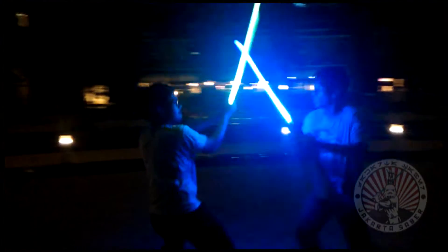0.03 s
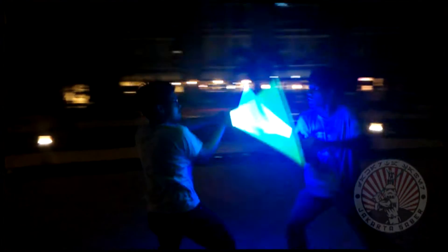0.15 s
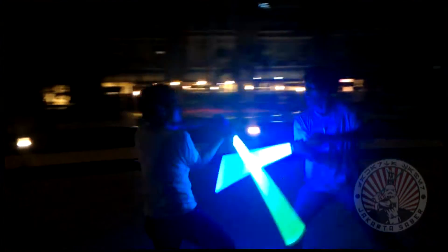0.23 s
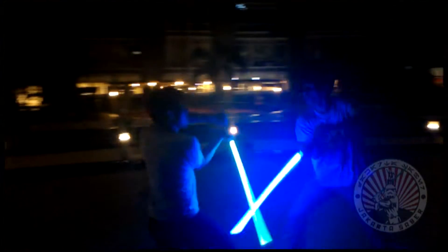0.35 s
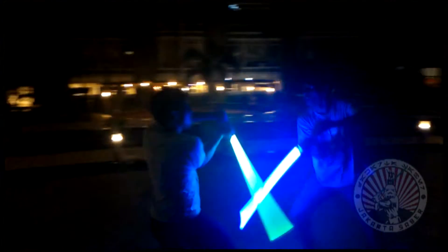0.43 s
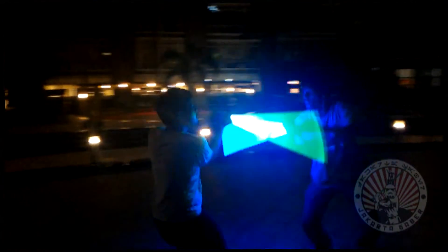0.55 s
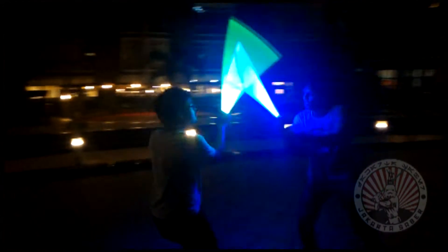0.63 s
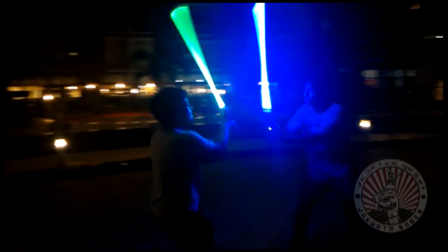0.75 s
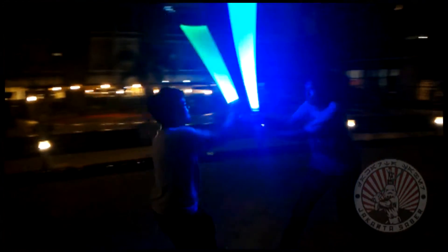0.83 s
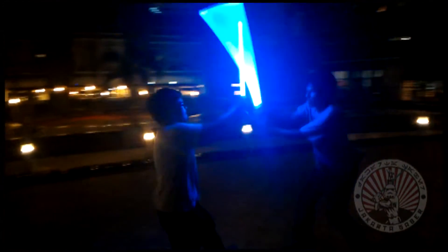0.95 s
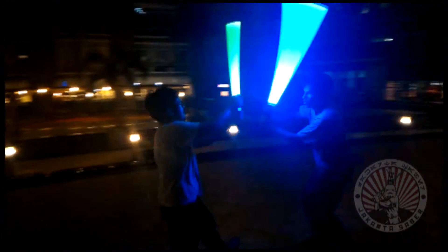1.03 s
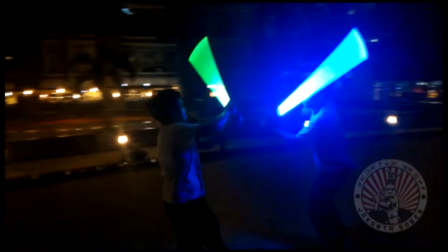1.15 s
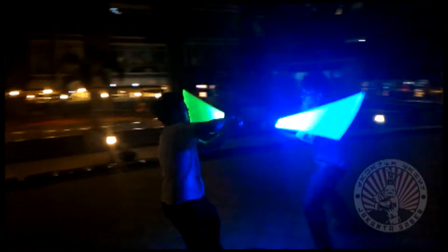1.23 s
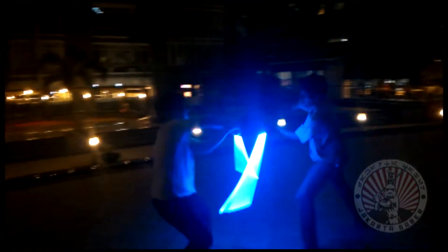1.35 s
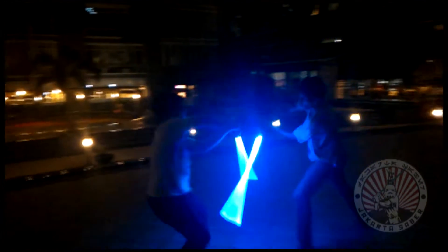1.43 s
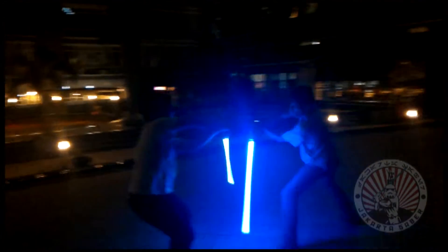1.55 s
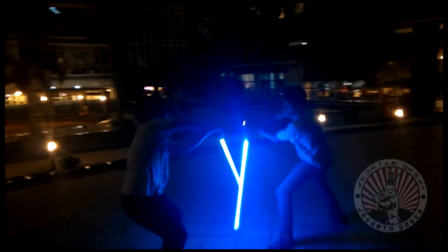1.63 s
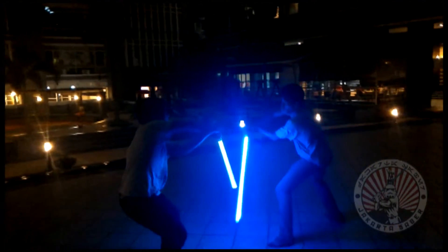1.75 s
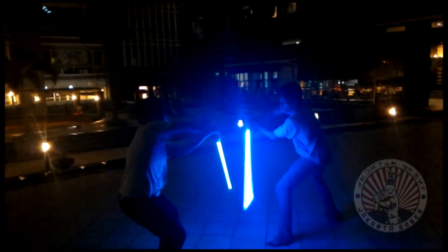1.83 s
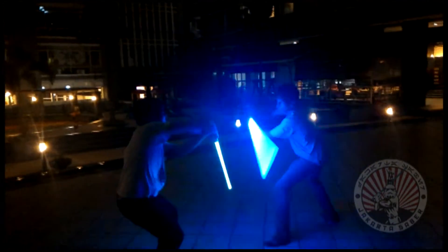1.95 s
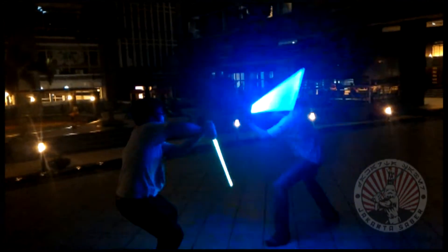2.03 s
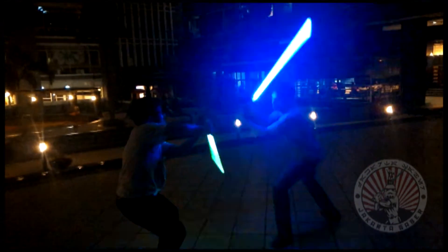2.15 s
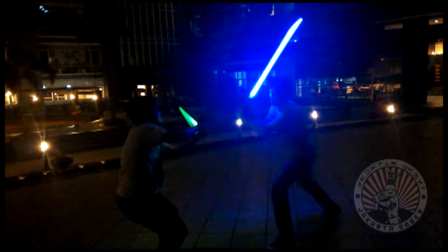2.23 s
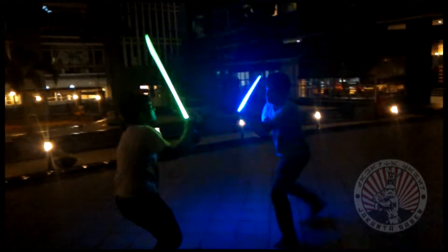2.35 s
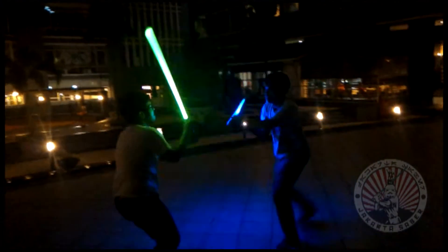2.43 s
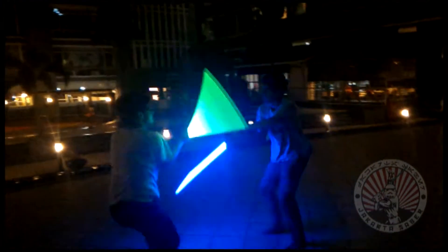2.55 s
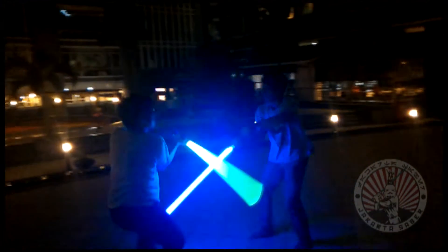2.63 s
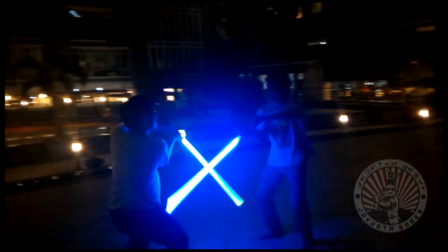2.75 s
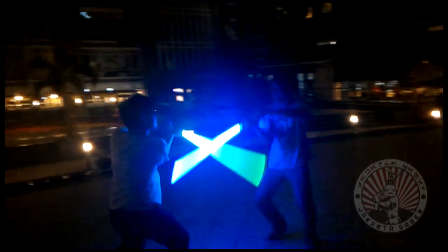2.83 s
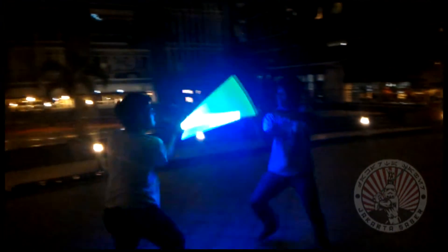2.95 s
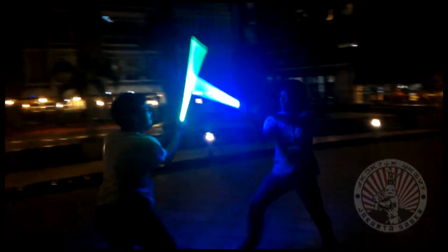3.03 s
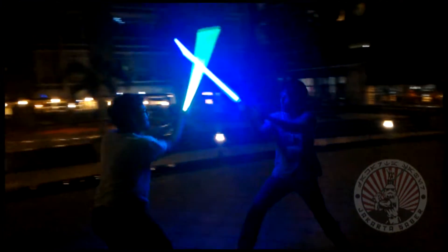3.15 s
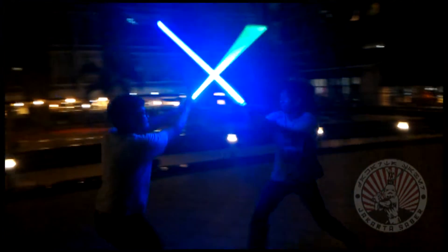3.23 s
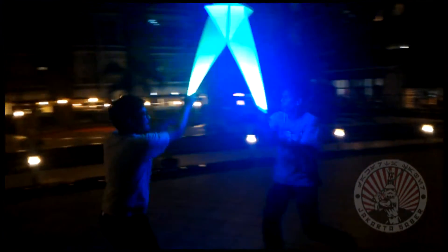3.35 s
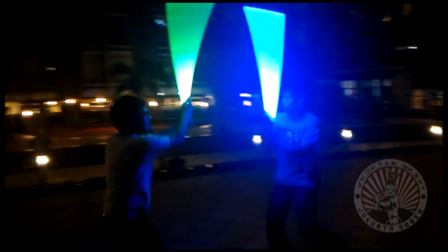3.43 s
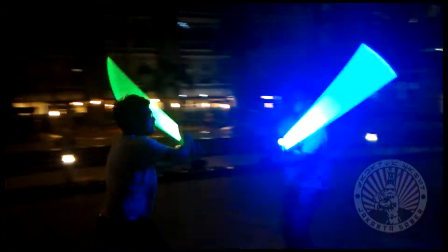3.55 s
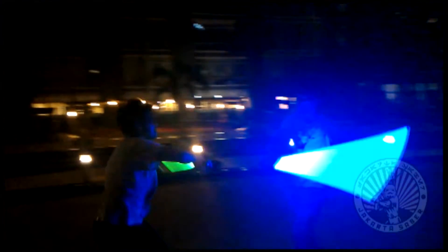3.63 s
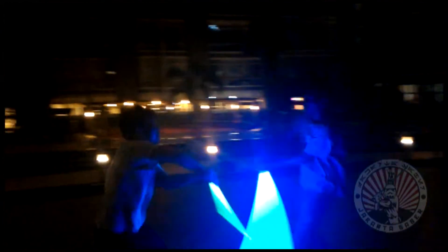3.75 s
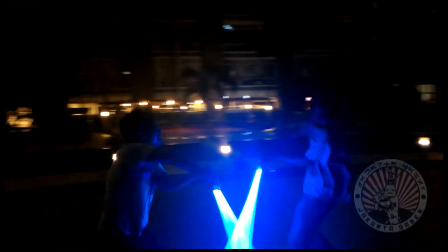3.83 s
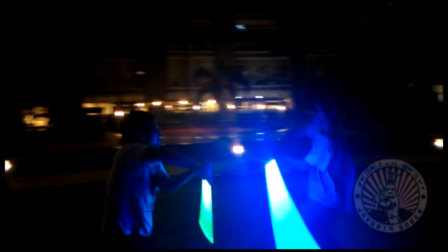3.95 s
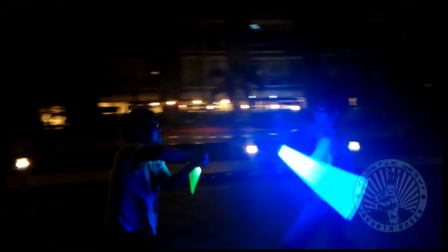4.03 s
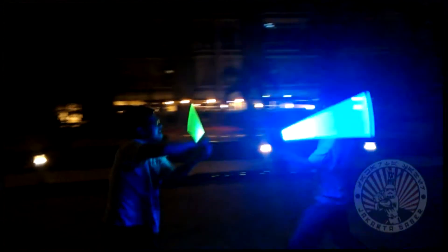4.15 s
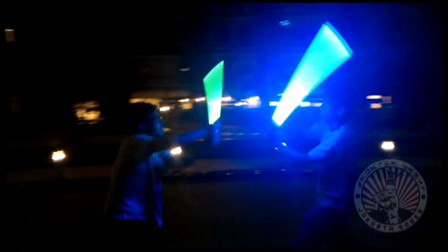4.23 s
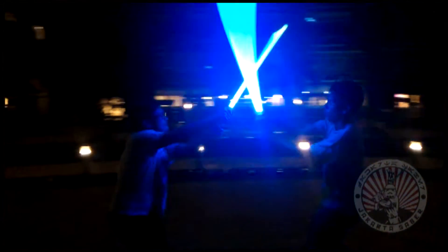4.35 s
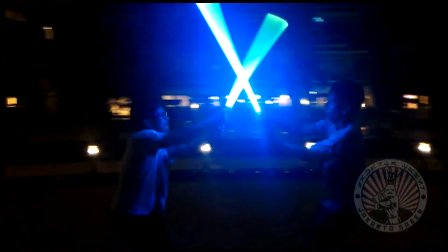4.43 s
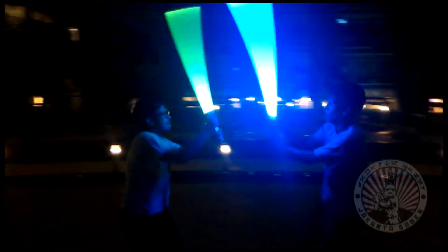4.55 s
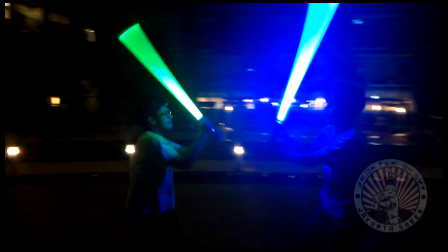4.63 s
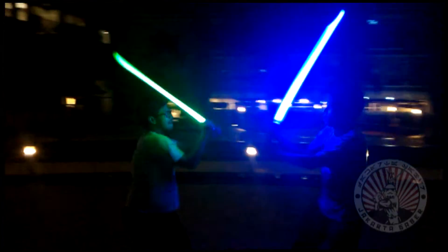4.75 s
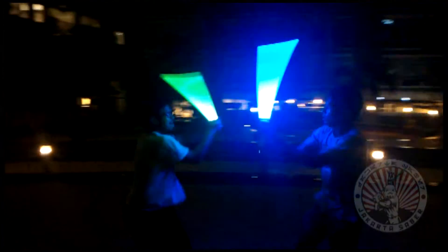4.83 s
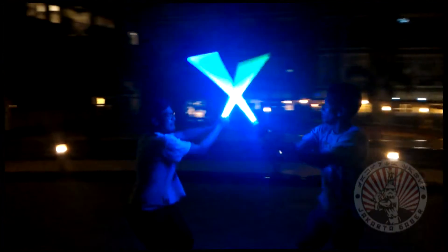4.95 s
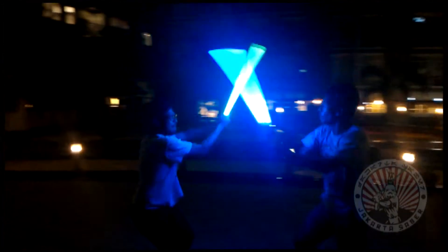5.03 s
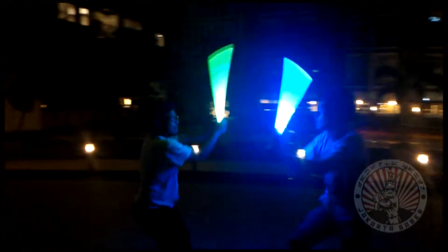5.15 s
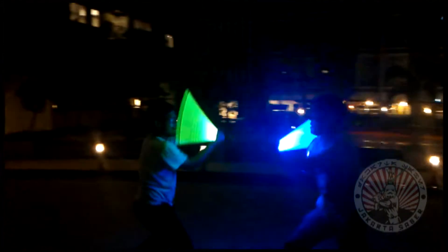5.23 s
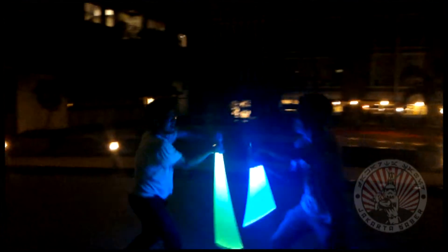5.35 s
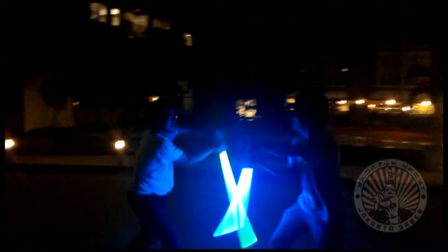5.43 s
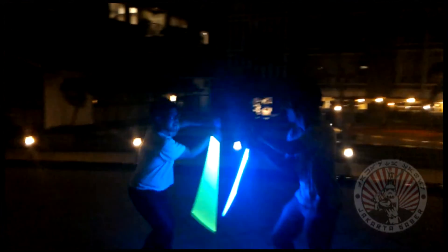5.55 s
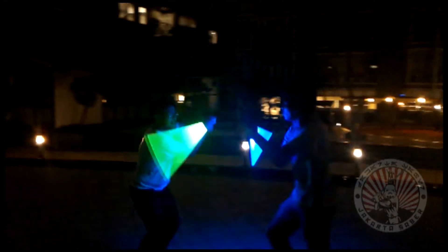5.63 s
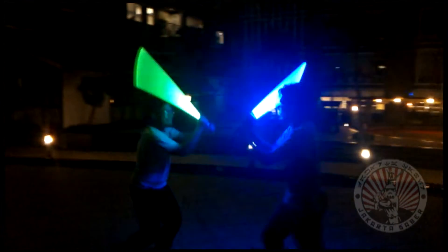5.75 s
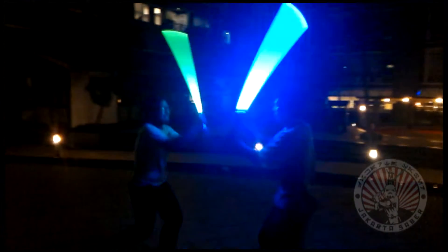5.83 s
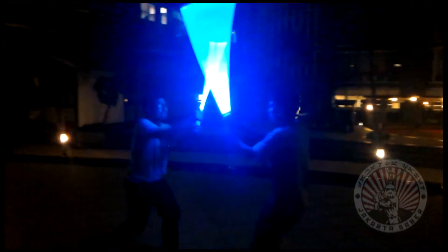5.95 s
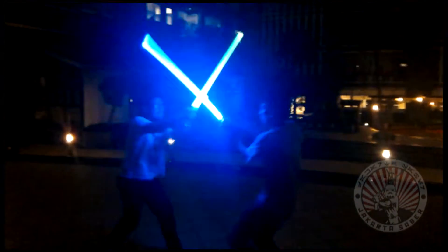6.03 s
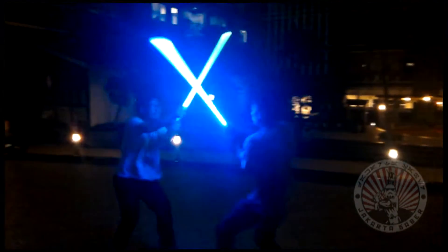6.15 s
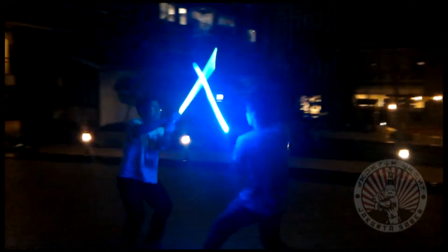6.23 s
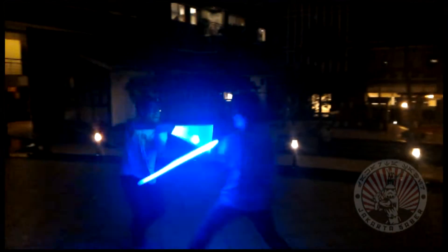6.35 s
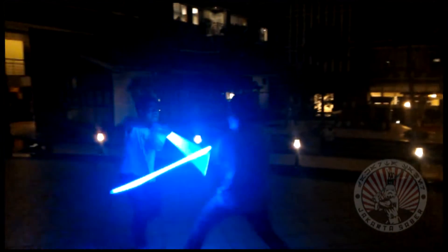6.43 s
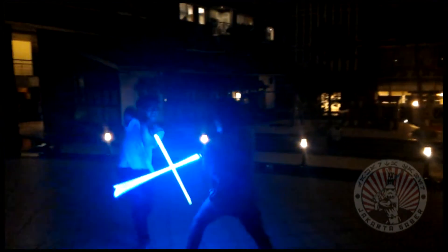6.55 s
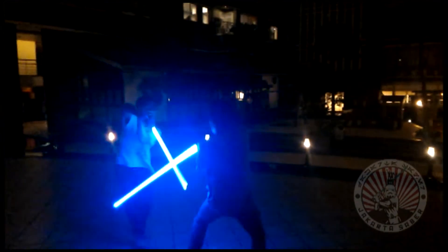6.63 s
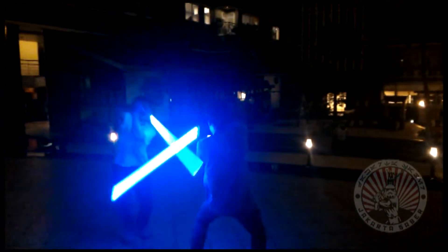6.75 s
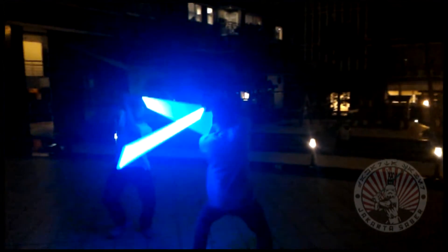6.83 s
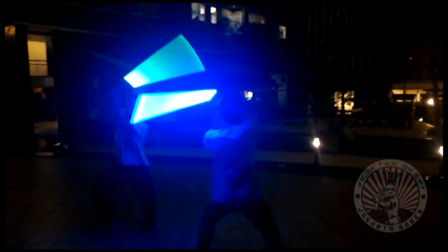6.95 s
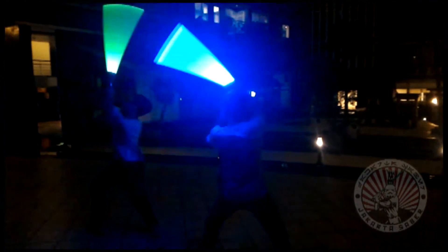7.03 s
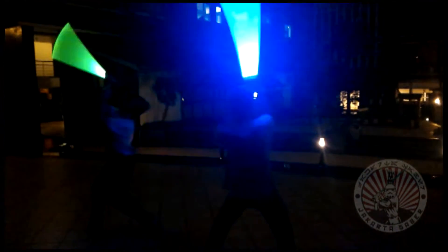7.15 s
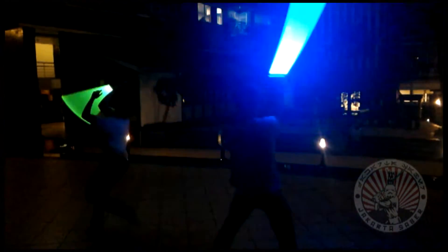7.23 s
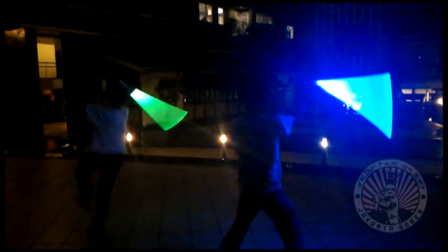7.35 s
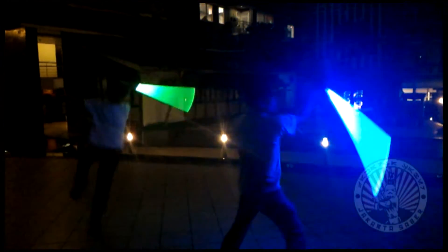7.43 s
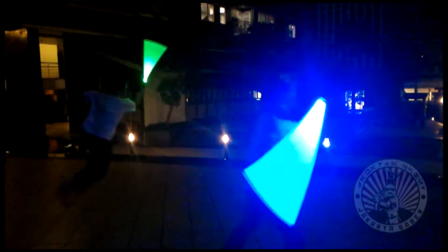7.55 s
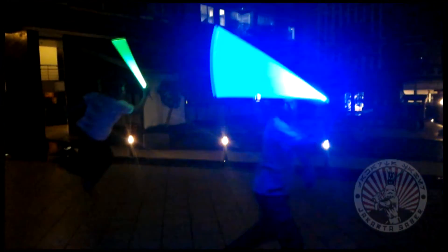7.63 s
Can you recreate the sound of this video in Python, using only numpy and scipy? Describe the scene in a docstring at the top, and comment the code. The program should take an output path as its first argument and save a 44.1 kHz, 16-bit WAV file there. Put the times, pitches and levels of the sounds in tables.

```python
"""Two people spar with hollow plastic light-sword blades on a paved square, a few metres from a small camera.
Each clack is a blow, a rebound and a short chatter of the tubes, built from decaying modes and noise.
Paving and house fronts throw it back as filtered noise echoes. Shoes tap and scuff as resonant and hissing noise.
Wind nudges the microphone as deep noise, and traffic rumbles beyond the square with a weak drone and faint squeal."""
import sys
import numpy as np
from scipy import signal
from scipy.fft import rfft, irfft
from scipy.io import wavfile
from scipy.ndimage import uniform_filter1d

SR = 44100
rng = np.random.default_rng(int(sys.argv[2]) if len(sys.argv) > 2 else 0)


def wav_out(sig):
    """Save sig, one row per channel (or a flat mono array), as 16-bit PCM at SR to the path in sys.argv[1]."""
    wavfile.write(sys.argv[1], SR, np.round(np.clip(np.atleast_2d(sig).T, -1, 1) * 32767).astype(np.int16))


N = 339129
T = np.arange(N) / SR

# ringing modes of the hollow tubes: f/Hz, level/dB (relative), t60/s
TUBE_MODES = [(236, -5.5, 0.082), (322, -26, 0.079), (448, -9.5, 0.12), (530, -11.5, 0.11),
              (643, -0.5, 0.054), (893, -6, 0.019), (1070, 0.5, 0.03), (1165, -3, 0.048),
              (1302, -4.5, 0.061), (1523, 1, 0.016), (1630, -10, 0.078), (1957, 0.5, 0.082),
              (2470, 0.5, 0.017), (2660, -12, 0.024), (2854, 1, 0.043), (3010, 2, 0.043),
              (3255, -2.5, 0.017)]


def undb(db):
    """Decibels to gain."""
    return 10 ** (np.asarray(db) / 20)


def unit(x):
    """Scale to an energy of one."""
    return x / np.sqrt(np.sum(x ** 2))


def level(x, db):
    """Scale to an rms level in dB."""
    return x * undb(db) / np.std(x)


def curve(rows):
    """Join (t/s, value) rows by straight lines."""
    return np.interp(T, *np.transpose(rows))


def swells(rows):
    """Gain of sounds that rise and fall smoothly: (middle t/s, length/s, level/dB) rows."""
    return sum(undb(db) * np.exp(-2 * ((T - s) / length) ** 2) for s, length, db in rows)


def fade(t, t60):
    """Exponential decay by 60 dB in t60 seconds."""
    return np.exp(-np.log(1000) * t / t60)


def add(track, s, x):
    """Mix x into track at time s."""
    i = max(int(s * SR), 0)
    part = x[:max(len(track) - i, 0)]
    track[i:i + len(part)] += part


def colour(x, points, size=8192):
    """Causal filter through (f/Hz, level/dB) points, built from the cepstrum."""
    hz, db = np.transpose(points)
    f = np.maximum(np.fft.rfftfreq(size, 1 / SR), 1)
    cepstrum = irfft(np.log(undb(np.interp(np.log(f), np.log(hz), db))))
    # folding the cepstrum onto positive times gives minimum phase
    cepstrum[1:size // 2] *= 2
    cepstrum[size // 2 + 1:] = 0
    impulse = irfft(np.exp(rfft(cepstrum)))
    return signal.fftconvolve(x, impulse)[:len(x)]


def band(x, hz, width_hz):
    """One resonance, gain 1 at its centre."""
    return signal.lfilter(*signal.iirpeak(hz, hz / width_hz, fs=SR), x)


def walk(rate):
    """Slow random wander with a spread of one, from rate random steps a second, smoothed twice."""
    k = int(SR / rate)
    steps = np.repeat(rng.standard_normal(N // k + 1), k)
    smooth = uniform_filter1d(uniform_filter1d(steps, k), k)
    return level(smooth[:N], 0)


def traffic(db=-47, engine_sway_db=0.43, tyre_sway_db=0.42, squeal_hz=1725, squeal_width_hz=30,
            drone_hz=500, drone_db=-63):
    """Distant engines and tyres are low and high noise, wavering a little, with a weak drone and a thin squeal."""
    # how busy the road is: t/s, level/dB
    busy = [(0, 1), (1, -1.5), (4.8, -.5), (7.1, 2.5), (7.69, 0)]
    # spectrum of the road heard across the square: f/Hz, level/dB
    road_colour = [(20, -8.5), (60, 3.5), (115, 6.5), (170, 2), (250, -3), (350, -8), (500, -9), (800, -10),
                   (1200, -10.5), (1700, -15.5), (2300, -17), (4000, -23), (8000, -23), (14000, -26.5)]
    # far squeals: middle t/s, length/s, level/dB
    squeals = [(0.66, 0.23, -59.5), (1.5, 0.71, -61.5), (3.22, 0.29, -66)]
    engines, tyres, drone, squeal = rng.standard_normal((4, N))
    busy_db = curve(busy)
    lowpass = signal.butter(2, 300, fs=SR, output="sos")
    highpass = signal.butter(2, 300, "high", fs=SR, output="sos")
    low = signal.sosfilt(lowpass, engines) * undb(busy_db + engine_sway_db * walk(6.7))
    # the tyres follow the swell only slightly
    high = signal.sosfilt(highpass, tyres) * undb(0.079 * busy_db + tyre_sway_db * walk(6.5))
    roar = level(colour(low + high, road_colour), db)
    drone = level(band(drone, drone_hz, 32), drone_db)
    squeal = band(band(squeal, squeal_hz, squeal_width_hz), squeal_hz, squeal_width_hz)
    return roar + drone + level(squeal, 0) * swells(squeals)


def wind(sway_db=3.5, sways_per_s=12):
    """Gusts buffet the microphone over a light breeze; the eddies are slow, so it is all deep rumble."""
    # spectrum of the rumble: f/Hz, level/dB
    wind_colour = [(10, -11), (22, 1), (33, 2), (50, -5), (75, -8), (120, -17), (200, -33.5), (400, -43),
                   (1500, -76)]
    # the light breeze between the gusts: t/s, level/dB
    breeze_rows = [(0, -50), (1.5, -50.5), (4.6, -50), (6.3, -48.5), (7.69, -49)]
    # gusts on the microphone: middle t/s, length/s, level/dB
    gusts = [(1.975, 0.052, -30.5), (2.09, 0.038, -29.5), (2.25, 0.38, -38), (2.365, 0.058, -24),
             (2.81, 0.24, -34), (3.06, 0.11, -31.5), (3.6, 0.055, -41), (3.9, 0.26, -44),
             (4.22, 0.062, -41.5), (5.215, 0.06, -33), (5.42, 0.14, -38), (5.8, 0.087, -41.5),
             (7.03, .05, -38), (7.46, 0.12, -46)]
    eddies = colour(rng.standard_normal(N), wind_colour)
    # even out the noise, so that the tables alone set its level
    eddies /= np.sqrt(uniform_filter1d(eddies ** 2, SR // 6))
    breeze = undb(curve(breeze_rows) + sway_db * walk(sways_per_s))
    return eddies * np.hypot(breeze, swells(gusts))


def shoes(step_t60=0.066, grit_db=2):
    """Soles landing give dull taps of resonant noise; sliding soles give a hiss with a gritty flutter."""
    # shoes landing on the paving: t/s, level/dB (of energy), f/Hz
    landings = [(0.066, -19, 835), (0.1562, -22.5, 1160), (2.6793, -27, 1100), (2.7927, -25, 890),
                (3.215, -26, 1000), (5.337, -16.5, 990), (5.77, -19, 1200)]
    # soles sliding: middle t/s, length/s, level/dB (relative)
    scuffs = [(0.028, 0.2, -54), (1.07, 0.13, -48.5), (1.294, 0.16, -57), (1.547, 0.25, -53),
              (2.432, .25, -58), (2.625, .16, -62), (3.206, 0.15, -59), (5.71, 0.28, -56.5),
              (6.34, 0.31, -57), (7.615, 0.45, -58)]
    # spectrum of the slide: f/Hz, level/dB
    scuff_colour = [(300, -37), (2000, 1), (4000, 3.5), (6500, 7), (11000, 8.5), (14000, 7)]
    out, t = np.zeros(N), T[:SR // 4]
    for s, db, hz in landings:
        thud = rng.standard_normal(len(t)) * fade(t, step_t60)
        tap = band(band(thud, hz, 660), hz, 1500)
        add(out, s, undb(db) * unit(tap))
    grit = undb(grit_db * walk(74))
    hiss = level(colour(rng.standard_normal(N), scuff_colour), 1.1)
    return out + swells(scuffs) * grit * hiss


def square(near, outward, scatter_db=-18, scatter_t60=0.35, slap_s=0.053, slap_db=-24,
           far_s=0.11, far_db=-18.5, far_t60=1.8):
    """Open-air echo: quick scatter off paving and kerbs, one slap, then a thin late wash from the house fronts."""
    # spectrum of what the square returns: f/Hz, level/dB
    echo_colour = [(100, -12), (300, 6), (1000, 1), (2600, -5), (5000, 1.5), (9000, -3.5), (14000, -8)]
    t = T[:SR]
    quick, slap, late = rng.standard_normal((3, SR))
    ground, fronts = np.zeros((2, SR))
    add(ground, 0.012, undb(scatter_db) * unit(quick * fade(t, scatter_t60)))
    add(ground, slap_s, undb(slap_db) * unit(slap * fade(t, 0.011)))
    onset = 1 - np.exp(-t / 0.0044)
    add(fronts, far_s, undb(far_db) * unit(late * fade(t, far_t60) * onset))
    echo = signal.fftconvolve(near, ground) + signal.fftconvolve(outward, fronts)
    return colour(echo[:N], echo_colour)


def contact(t, wall_hz, wall_db=-7, wall_t60=0.0033, ring_db=-6, crack_db=-4, crack_t60=0.008, detune=0.017):
    """One contact: a click, a noisy crack, a brief ping of the tube wall and modes of varying tuning and sign."""
    hz, db, t60 = np.transpose(TUBE_MODES)[:, :, None]
    tuning, side = rng.standard_normal((2, len(hz), 1))
    tones = np.sin(2 * np.pi * hz * (1 + detune * tuning) * t)
    ring = np.sum(np.sign(side) * undb(db) * fade(t, t60) * tones, axis=0)
    wall = np.cos(2 * np.pi * wall_hz * t) * fade(t, wall_t60)
    crack = rng.standard_normal(len(t)) * fade(t, crack_t60)
    # the crackle of hard plastic is nearly all treble
    crack = colour(crack, [(1000, -21), (3500, -13), (6000, -4), (13000, -0.5)])
    click = t == 0
    return click + undb(wall_db) * unit(wall) + undb(crack_db) * unit(crack) + undb(ring_db) * unit(ring)


def chatter(t, t60, rate=1000, buzz_db=-5, buzz_stretch=2.64, onset_s=0.0016, hollow_db=2):
    """The shaken tubes rattle against each other: dying ticks over a fine buzz, which ring the same modes."""
    size, buzz = rng.standard_normal((2, len(t)))
    # rate is the mean number of ticks per second
    ticks = size * (rng.random(len(t)) < rate / SR)
    build = 1 - np.exp(-t / onset_s)
    ticks = unit(ticks * build * fade(t, t60))
    buzz = unit(buzz * build * fade(t, buzz_stretch * t60))
    rattle = ticks + undb(buzz_db) * buzz
    # a resonance decays faster the wider it is
    ring = sum(undb(db) * band(rattle, hz, np.log(1000) / (np.pi * ring_t60))
               for hz, db, ring_t60 in TUBE_MODES)
    tone = [(300, 1.5), (1200, 2), (2800, 0.5), (6000, 4.5), (13000, 3)]
    return unit(colour(rattle + undb(hollow_db) * ring, tone))


def disperse(x, lag_ms=((300, 1.5), (700, 4), (1100, 5), (1600, 3.5), (2300, 0.6), (3000, 0))):
    """Bending waves of middle pitch travel slowly along the tube and arrive after the snap: (f/Hz, lag/ms)."""
    hz, ms = np.transpose(lag_ms)
    f = np.fft.rfftfreq(len(x), 1 / SR)
    lag = np.interp(f, hz, ms) / 1000
    # phase is the running sum of the delay over frequency
    phase = 2 * np.pi * np.cumsum(lag) * f[1]
    return irfft(rfft(x) * np.exp(-1j * phase), len(x))


def clack(wall_hz, rebound_ms, rebound_db, chatter_db, chatter_t60, loose_db=7.0, wall_gain=0.47,
          wall_width_hz=220, ping_hz=13400, ping_db=-4, ping_t60=0.0026):
    """Blow, rebound and chatter, with a brief, very high ping and one favoured resonance of the wall."""
    t = T[:SR // 4]
    ping = unit(np.sin(2 * np.pi * ping_hz * t) * fade(t, ping_t60))
    blow = contact(t, wall_hz) + undb(ping_db) * ping
    x = blow + undb(chatter_db + loose_db) * chatter(t, chatter_t60)
    add(x, rebound_ms / 1000, undb(rebound_db) * contact(t, wall_hz))
    return disperse(x + wall_gain * band(x, wall_hz, wall_width_hz))


def balance(x, db, body_db, body_tilt_db, snap_db, snap_tilt_db):
    """Share a blow's energy: the spot that is hit colours the body, the hardness of the contact the snap."""
    # edges of the bands that are balanced: f/Hz
    band_edges = [200, 700, 1350, 2100, 4000, 11800, 14000]
    # the tube's bending modes fill the body; the wall rings above it, and the snap lies above that
    body_pivot_hz, body_top_hz, snap_from_hz = 1000, 2100, 4000
    bass_loss_db = 24  # thin tubes radiate little bass
    edges = np.array(band_edges)
    hz = np.sqrt(edges[:-1] * edges[1:])
    body = (hz < body_top_hz) * (body_db + body_tilt_db * np.log2(hz / body_pivot_hz))
    snap = (hz > snap_from_hz) * (snap_db + snap_tilt_db * np.log2(hz / (2 * snap_from_hz)))
    bands = np.split(np.abs(rfft(x)) ** 2, edges * len(x) // SR)[1:-1]
    present_db = [10 * np.log10(b.mean()) for b in bands]
    gains_db = db + body + snap - present_db
    bass = [(60, gains_db[0] - bass_loss_db), (200, gains_db[0])]
    return colour(x, bass + list(zip(hz, gains_db)))


def blades(knock_gain=1.17, knock_width_hz=48):
    """Tubes struck and touched: what comes straight to the camera, and what goes out across the square."""
    # blade on blade: t/s, level/dB, tube body/dB, body tilt/(dB per octave), snap/dB, snap tilt/(dB per octave),
    # wall f/Hz, knock f/Hz, rebound delay/ms, rebound level/dB, chatter level/dB (before loose_db), chatter t60/s
    strikes = [(0.3297, 9.5, -1.5, 0, 0, -0.5, 2870, 420, 3, 0.5, 0, 0.035),
               (0.904, 5.5, -5.5, 4, -3.5, 4, 3240, 820, 2.05, 7, 4.5, 0.045),
               (1.412, 12.5, -4.5, 4.5, -3, -0.5, 2640, 1523, 1.72, 2, 0.5, 0.051),
               (1.6697, 6.5, -7.5, 1.2, -4.5, 0.5, 3190, 476, 13, -3, 3, 0.039),
               (2.7416, 10.2, -1.3, 1.5, -2, 4, 2820, 430, 0.99, -9, -1.5, 0.043),
               (3.273, 4, -0.5, -0.2, 2, 1.5, 2650, 450, 6.3, -15, -3.5, 0.056),
               (3.8448, 15, -5, 4, -3.5, 3.5, 2630, 1570, 6.6, -5, 5, 0.052),
               (4.4049, 3, -1, 5, 1.5, 1.5, 3090, 1140, 2, -4, -1, 0.047),
               (4.9826, 12, -5.5, 1, -3.5, -.5, 2610, 960, 6.8, -5, -6, 0.043),
               (5.4791, 10, -1, 2, -5.5, 9, 2900, 640, 4.3, -4, 2.5, 0.039),
               (6.04, 5, -0.9, -1, -4, 1, 2900, 496, 14.5, -6, -3, 0.11),
               (6.575, 8.6, -4.5, -2.5, -4.5, 7, 2840, 610, 3.07, -2.5, -2.5, 0.067)]
    # light touches of the blades: t/s, level/dB (relative), treble/dB (of the filter from 5500 Hz up)
    touches = [(0.948, -7.5, -2), (1.431, 1, 0), (1.465, -9.5, -7), (1.604, -23, 4), (2.648, -31.5, 11.5),
               (2.8505, -27, 5.5), (3.3022, -9.5, 1), (3.898, -12, 4), (3.9654, -13.5, -8),
               (4.74, -34.5, 15), (6.4378, -3.5, -18), (6.596, -1, -18), (6.626, -9, -3.5),
               (7.143, -5.5, -17)]
    # how strongly the house fronts return the clacks as the fight moves across the square: t/s, level/dB
    fronts_return = [(0, -3.5), (5.5, 0), (6.0, 7), (7.69, 8)]
    near, outward = np.zeros((2, N))
    for s, *force, wall_hz, knock_hz, rebound_ms, rebound_db, chatter_db, chatter_t60 in strikes:
        x = clack(wall_hz, rebound_ms, rebound_db, chatter_db, chatter_t60)
        x = balance(x, *force)[:SR // 5]
        # the hollow knock of the tube is only heard close by
        add(near, s, x + knock_gain * band(x, knock_hz, knock_width_hz))
        add(outward, s, x)
    t = T[:SR // 4]
    for s, db, treble_db in touches:
        touch = contact(t, wall_hz=3100, wall_db=-4.5, ring_db=-14)
        x = unit(touch + undb(3.5) * chatter(t, t60=0.019))
        tone = [(100, -13), (500, 1), (2800, -7), (5500, treble_db)]
        add(near, s, undb(db) * colour(x, tone))
    return near, outward * undb(curve(fronts_return))


def scene():
    """The duel on the square, in mono."""
    near, outward = blades()
    mix = near + square(near, outward) + shoes() + wind() + traffic()
    return mix[None]


def record(dry):
    """The camera's microphone port rings near 3 kHz and lifts again near the top, where the band ends steeply."""
    # response of the microphone: f/Hz, level/dB
    microphone = [(20, 1.5), (1000, -1), (2100, 2), (2550, 6.5), (3000, 9), (3350, 2.5), (3800, -9.5),
                  (5000, -14.5), (8000, -10), (11500, -9.5), (12600, -6.5), (13600, -4), (15000, -13)]
    top_hz = 14000
    x = colour(dry[0], microphone)
    steep = signal.ellip(10, 0.2, 70, top_hz, fs=SR, output="sos")
    return signal.sosfilt(steep, x)[None]


dry = scene()
out = record(dry)
wav_out(out)
```